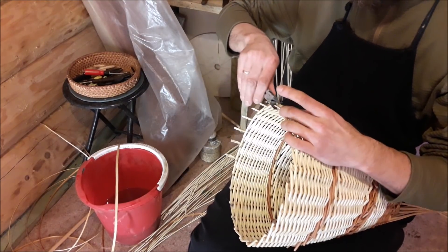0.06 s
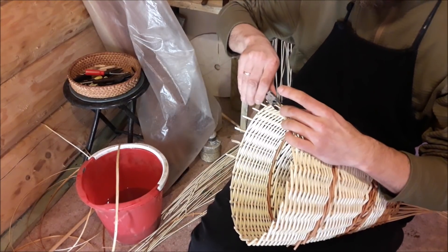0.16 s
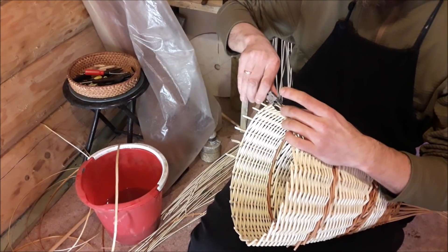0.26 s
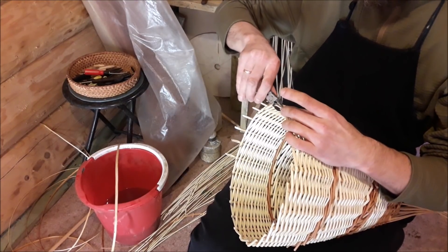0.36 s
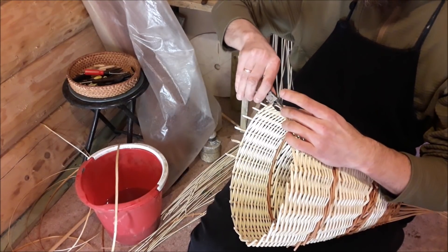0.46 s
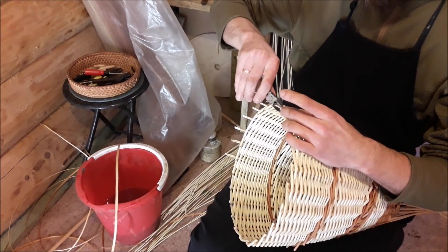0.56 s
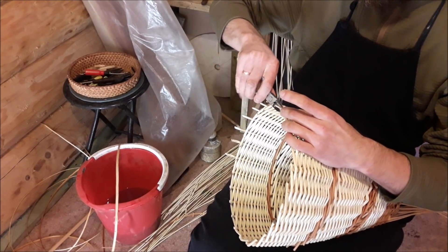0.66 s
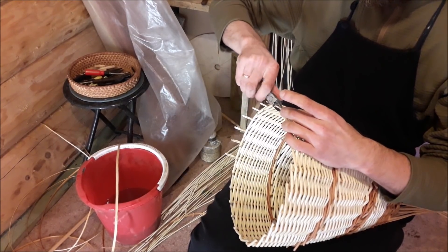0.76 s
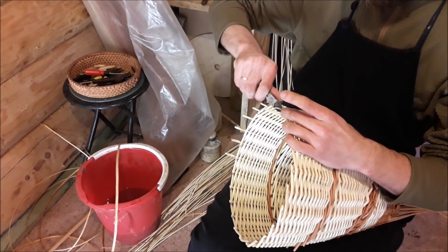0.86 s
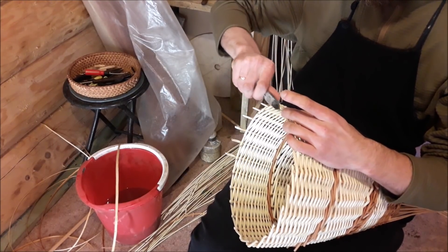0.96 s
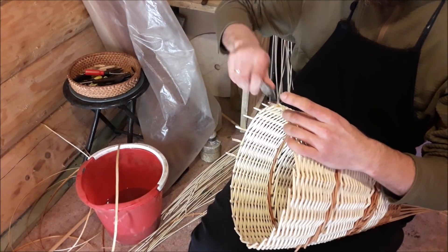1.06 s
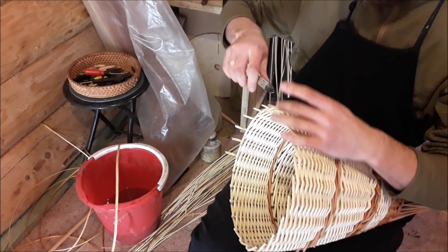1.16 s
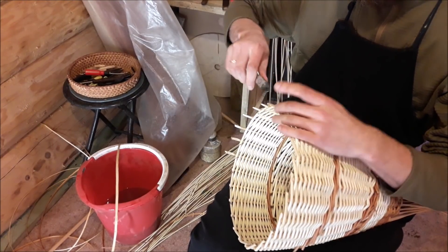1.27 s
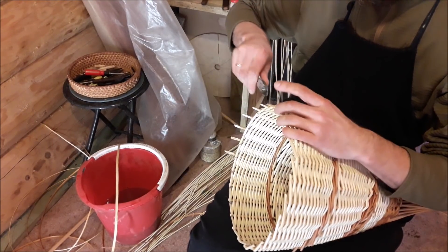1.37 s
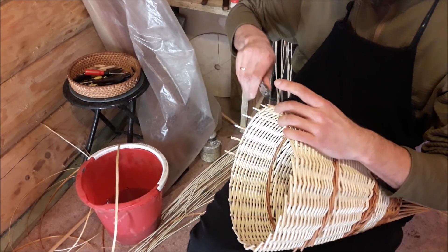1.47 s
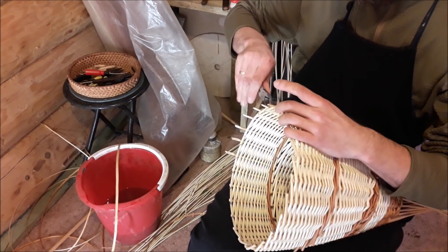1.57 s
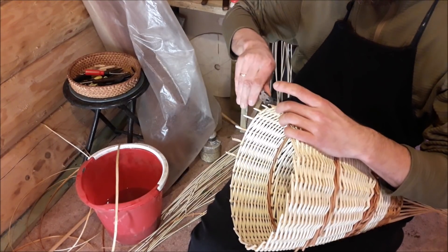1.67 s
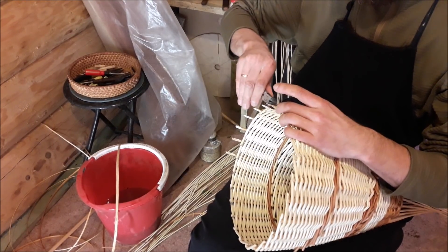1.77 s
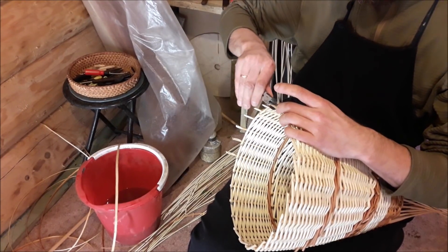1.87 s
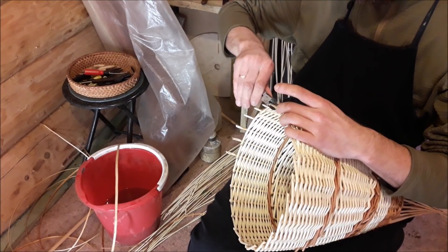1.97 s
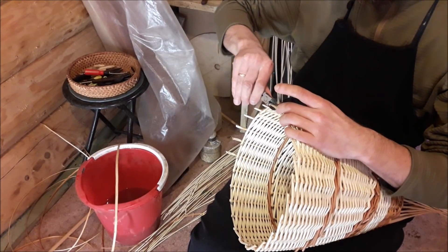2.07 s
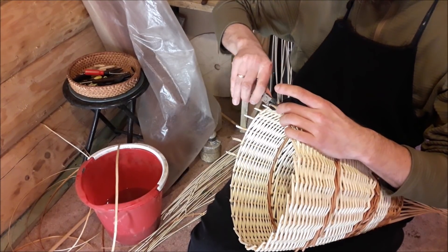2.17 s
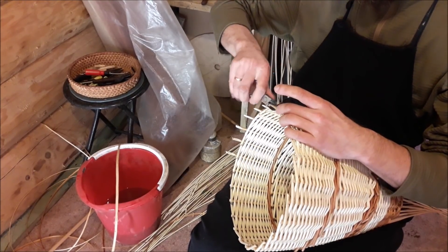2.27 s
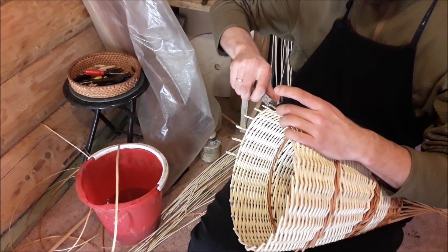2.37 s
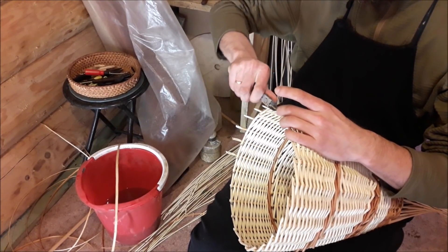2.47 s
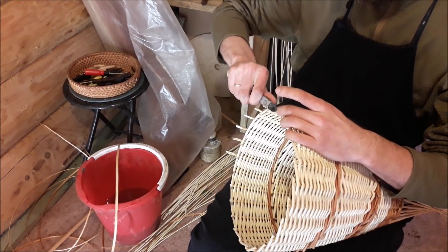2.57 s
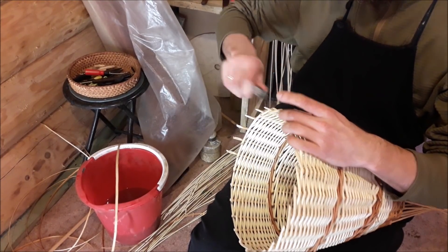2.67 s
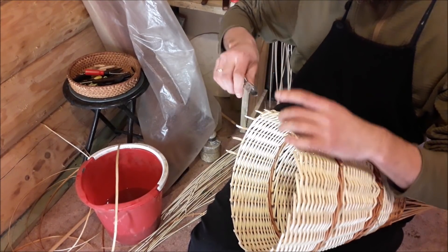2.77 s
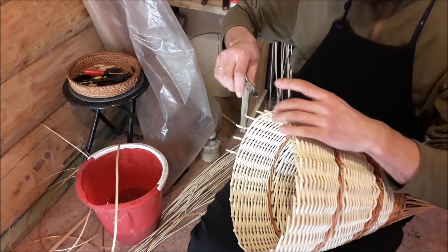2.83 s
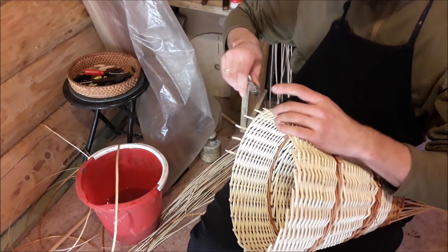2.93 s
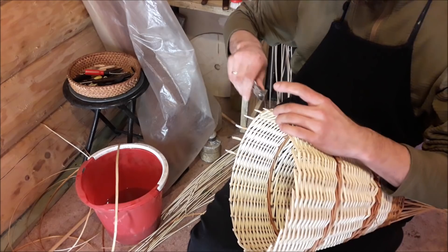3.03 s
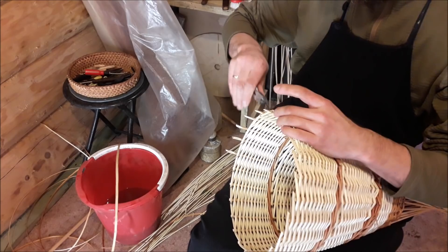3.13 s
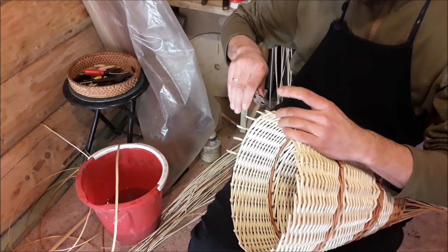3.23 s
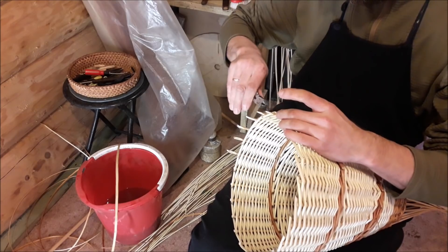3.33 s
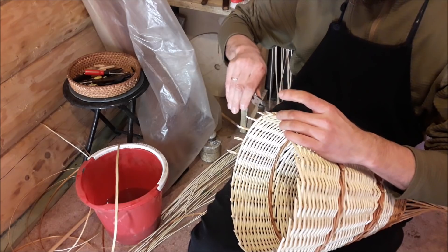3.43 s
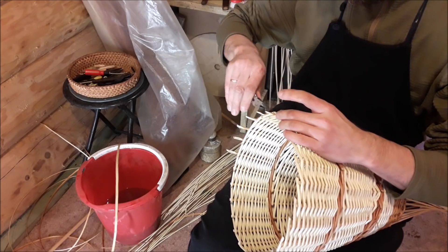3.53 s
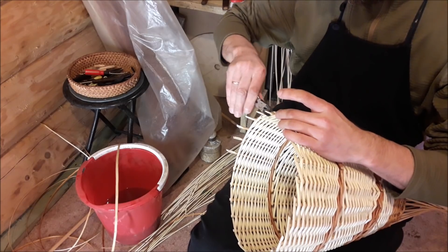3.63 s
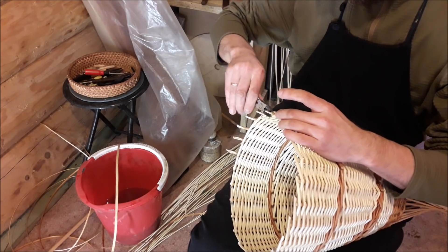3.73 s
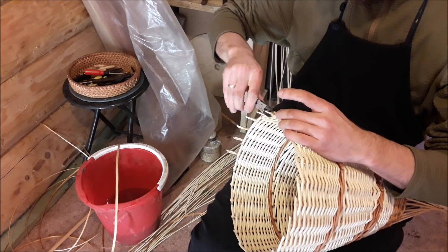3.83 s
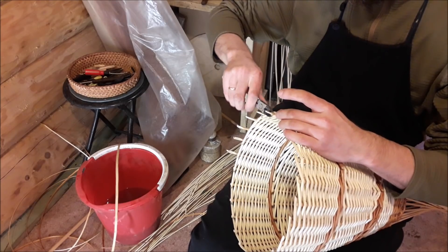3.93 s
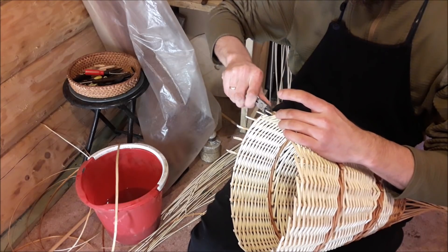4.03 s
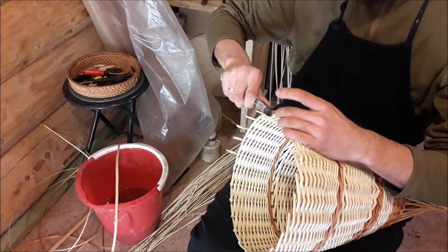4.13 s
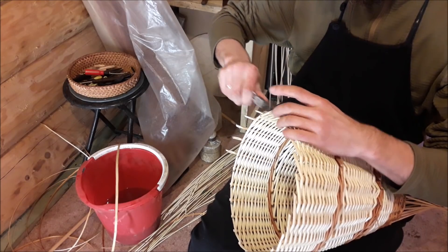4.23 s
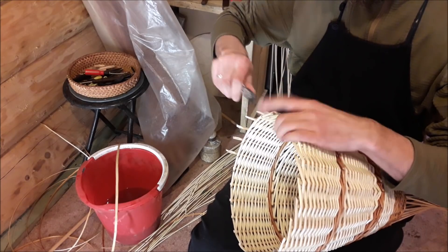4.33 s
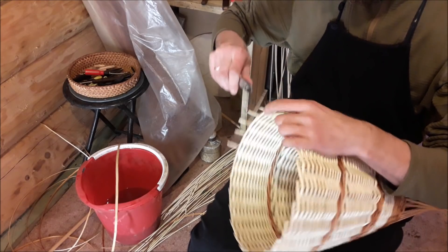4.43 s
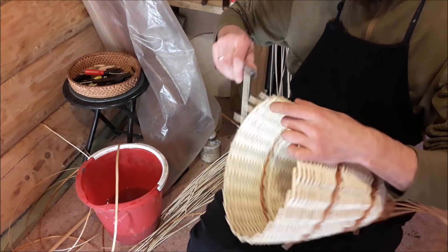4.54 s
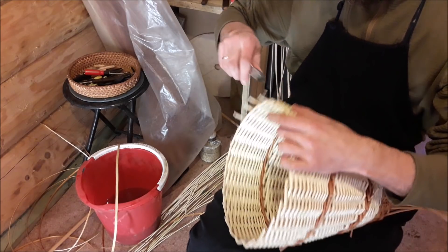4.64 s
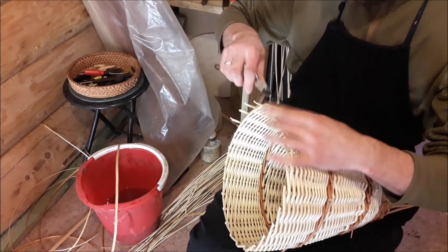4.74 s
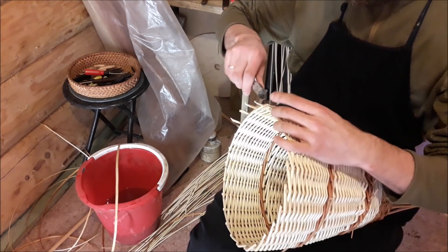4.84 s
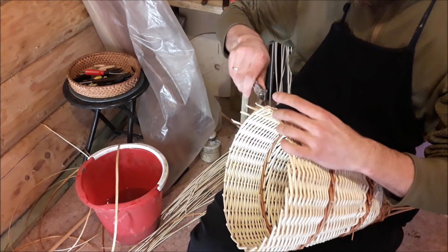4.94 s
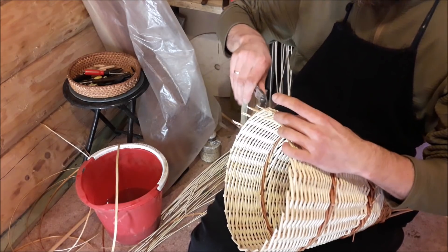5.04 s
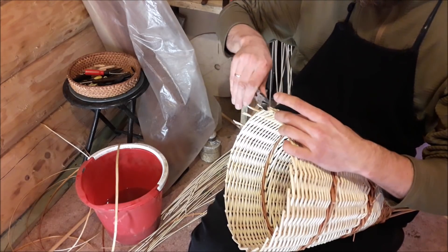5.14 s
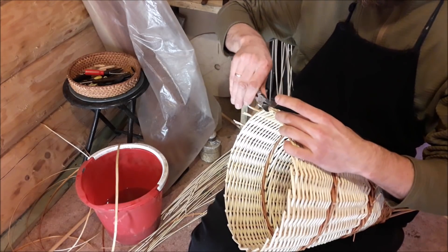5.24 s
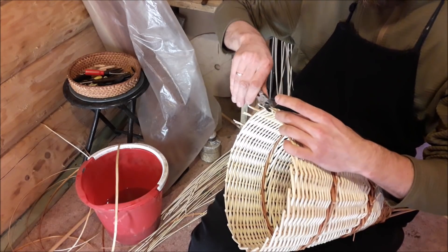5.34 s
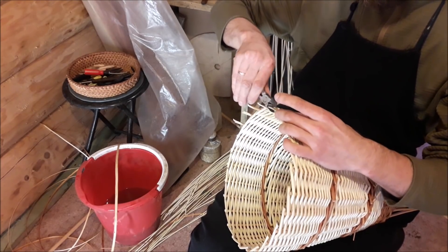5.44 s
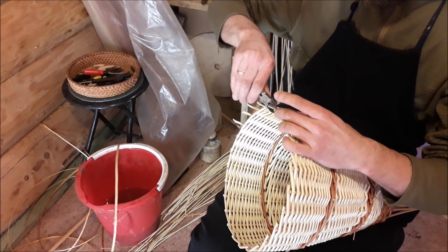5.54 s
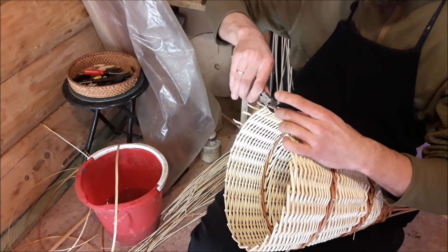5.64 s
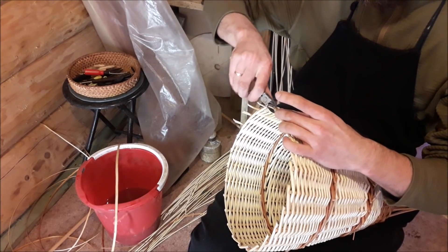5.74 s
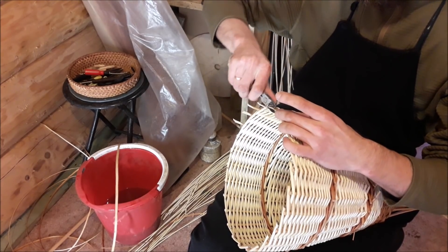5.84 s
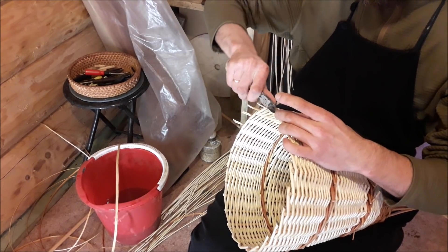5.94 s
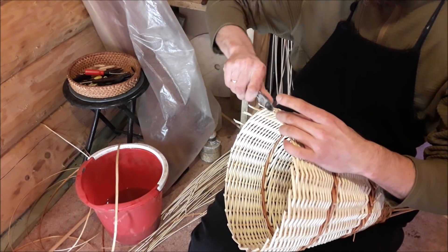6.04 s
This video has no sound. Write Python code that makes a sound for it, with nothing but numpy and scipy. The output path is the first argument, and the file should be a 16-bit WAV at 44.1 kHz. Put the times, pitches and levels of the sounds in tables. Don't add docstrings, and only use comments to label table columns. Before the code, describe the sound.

Shears snap crisply through rods about every one and a half to two seconds, between light ticks, woven creaks and a hollow basket bump.

```python
import sys
import numpy as np
from scipy import signal
from scipy.fft import rfft, irfft, next_fast_len
from scipy.io import wavfile
from scipy.ndimage import uniform_filter1d

SR = 44100
rng = np.random.default_rng(int(sys.argv[2]) if len(sys.argv) > 2 else 0)


def voltage_ratio(decibels):
    exponent = np.asarray(decibels, float) / 20
    return 10 ** exponent


def waveform_to_disk(signal):
    frames = np.transpose(np.atleast_2d(signal))
    scaled = np.clip(frames, -1, 1) * 32767
    samples = np.round(scaled).astype(np.int16)
    wavfile.write(sys.argv[1], SR, samples)


N = 269010

# time in seconds, level in dB.
HUM = [(0.0, -68), (1.0, -67), (1.45, -71), (2.2, -69.5), (3.0, -66), (3.45, -69), (4.15, -68), (4.66, -68),
       (5.11, -67.5), (6.1, -65.5)]
# frequency in Hz, level in dB per Hz.
HUM_COLOUR = [(26, -21.5), (45, -6.5), (54, -6.5), (134, 1), (383, 0.5), (858, -5), (1100, -7.5),
              (1270, -9), (2030, -9.5), (4000, -15.5), (5200, -40.5), (8800, -120)]
# frequency in Hz, level in dB per Hz.
HISS_COLOUR = [(710, -16.5), (1200, -6.5), (3180, -8), (6790, -12), (8090, -21), (11900, -9.5),
               (15100, -9.5), (16000, -13), (16500, -27)]
# start in seconds, length in seconds, level in dB.
RUSTLE = [
    (0.0, 0.46, -75.5),
    (2.7, 0.44, -76.5),
    (4.33, 0.53, -63),
    (5.36, .18, -72),
    (5.701, .4, -77),
]
# frequency in Hz, level in dB per Hz.
RUSTLE_COLOUR = [(120, -28), (250, -33), (630, -12.5), (1500, -4.5), (3200, -3.5), (6900, -4.5),
                 (8200, -14.5), (11500, -8), (15800, -9), (16900, -64)]
# start in seconds, level in dB, pitch in octaves above 1 kHz,
# fall below that pitch in dB per octave.
TICKS = [(0.8681, -33, 3.44, 8.5), (1.1418, -23.5, 3.22, 10.5), (1.2181, -54.7, 3.6, 0),
         (1.2695, -64, 0.27, 1.0), (1.5385, -59, 2.8, 2), (1.7328, -27.5, 1.79, 12.5),
         (1.7416, -48.0, 2.0, 7.5), (1.8385, -44.5, 2.3, 4.5), (1.8518, -41.5, 2.6, 6),
         (1.8808, -40.5, 2.1, 8.5), (1.928, -37, 2, 14), (1.9646, -40.5, 1.44, 17), (1.9997, -50, 2.5, 6),
         (2.007, -33, 1.77, 17.5)]
# frequency in Hz, level in dB per Hz.
TICK_COLOUR = [(88, -42.5), (150, -13), (1480, -10), (1710, -14), (2160, -9.5), (3470, -7.5), (5260, -9.5),
               (6940, -7.5), (7970, -18), (15300, -16), (16900, -49.5)]
# start in seconds, level in dB, rod resonance in Hz,
# brightness in dB per octave, splintering treble in dB.
BITES = [
    (0.9231, -36.5, 3600, -2, 2),
    (1.1442, -46, 3000, 3.5, 4),
    (1.5766, -34, 4060, 2, -5.5),
    (2.4587, -37, 4500, 3, 3),
    (3.9231, -27, 3270, 1.5, -11),
]
# frequency in Hz, level in dB per Hz.
BITE_COLOUR = [(170, -41.5), (300, -13), (620, -12.5), (1400, -12), (2200, -9.5), (7000, -7), (15300, -13)]
# start in seconds, peak in dB, frequency in Hz, T60 in seconds.
JOLTS = [
    (.99, -19, 91, 0.0078),
    (.991, -29, 235, 0.015),
    (2.458, -47, 312, 0.025),
    (2.4576, -27, 890, 0.002),
    (2.465, -46.5, 916, .006),
    (6.031, -42, 89, .03),
]
# start in seconds, level in dB, blade ring in dB, jaw ring in dB,
# splintering treble in dB.
SNIPS = [
    (0.9927, -10.5, 14, 9, 2),
    (2.5804, -10.5, 7, 8.5, -4.5),
    (4.1816, -13, 7, 1.5, -5),
    (6.033, -11, 14.5, 7.5, 5),
]
# frequency in Hz, level in dB per Hz.
SNIP_COLOUR = [(110, -56), (190, -29), (420, -17.5), (1700, -19), (2850, -14), (4000, -12), (7000, -12),
               (15000, -7)]
# frequency in Hz, gain in dB.
CAPSULE = [(5000, -0.5), (6900, 0), (8400, -8.5), (10600, -0.5), (15400, -4), (16200, -12), (16900, -44.5)]
# start in seconds, peak in dB, frequency in Hz, T60 in seconds.
NOTES = [(1.22, -60.5, 2400, 0.026), (1.578, -57, 197, 0.2), (1.868, -42, 375, 0.017),
         (2.586, -47.5, 132, 0.1), (3.74, -60.5, 328, .05), (4.085, -61.5, 710, 0.01),
         (3.925, -38, 1500, 0.0058), (1.735, -42, 2600, 0.009), (1.54, -58, 4300, .01),
         (4.181, -43.5, 143, 0.048), (2.582, -34.5, 420, .01), (4.183, -22.5, 1470, .006),
         (4.64, -57.5, 1410, 0.018), (4.836, -39, 420, 0.025), (4.838, -30.5, 694, 0.017),
         (4.84, -40, 1010, 0.017), (5.006, -44, 465, 0.05), (5.044, -49, 1007, 0.023),
         (5.045, -48, 501, 0.045), (5.128, -47.5, 252, 0.08), (5.13, -37.5, 1430, 0.0087),
         (5.262, -42, 1920, 0.01), (5.345, -46, 1984, 0.012), (6.033, -36.5, 223, 0.059)]
# start in seconds, level in dB,
# pitch in octaves above 1 kHz, fall below that pitch in dB per octave.
FLICKS = [(2.4169, -59, 0.5, 1.5), (2.7986, -59.5, 3, 0.93), (2.8341, -51, 0.4, 2.0), (2.889, -63, 3, 1.5),
          (2.9894, -57, 4, 2.8), (3.046, -52.5, 1.4, 1.8), (3.208, -40.5, 3, 6), (3.7413, -46, 2.4, 2.4),
          (4.3613, -39, 1.85, 11), (4.4004, -55, 1.5, 4.0), (4.4376, -41.5, 2.5, 6.0),
          (4.5269, -50, 0.2, 0.81), (4.6369, -50.5, 2, 2.9), (5.188, -59, 2, 4.0), (5.255, -41, 3, 4.8),
          (5.2604, -39, 1.2, 5), (5.3385, -44.5, 2.5, 6.4), (5.3467, -40, 1.77, 9.9),
          (5.4678, -55, -0.5, 1.5), (5.92, -57, 2.5, 3.5)]
# start in seconds, level in dB, pitch in octaves above 1 kHz,
# fall below that pitch in dB per octave.
FIBRES = [
    (4.084, -53, 1.59, 3.76),
    (4.123, -48, 2.75, 2.5),
    (4.148, -48, 3.4, 3.5),
    (4.16, -40.5, 3.5, 2.6),
    (4.167, -33, 0.61, 5.2),
    (6.005, -48.5, 2.9, 6.1),
]
# start in seconds, level in dB, pitch in octaves above 1 kHz,
# fall below that pitch in dB per octave.
KNOCKS = [
    (4.8307, -31, -1.1, 2.72),
    (4.8386, -39.5, -1.2, 1.95),
    (5.0037, -40.5, 0.5, 3),
    (5.0414, -40.5, 0.46, 2.7),
    (5.1264, -46.5, -1.1, 1.2),
    (5.1347, -59, 1.2, 4.0),
]
# frequency in Hz, level in dB per Hz.
KNOCK_COLOUR = [(100, -48.5), (260, -10.5), (620, -5.5), (1150, -0.5), (1590, -3.5), (2150, 0.5),
                (2340, -2), (6850, -18.5), (8310, -40), (15200, -62.5), (16900, -68.5)]
BAND_EDGES_HZ = [200, 1200, 3500, 8000, 16000]
# frequency in Hz, T60 in seconds.
ROOM_T60_S = [(300, 0.21), (1200, .17), (2250, 0.18), (3500, 0.16), (6000, .16), (13000, .14)]

SPAN = 12288
HZ = np.fft.rfftfreq(SPAN, 1 / SR)
FIRST_ECHO_S, BUILD_UP_S, DENSE_AFTER_S = 0.0018, 0.012, 0.0081
BEND = 0.98
HISS_DB = -73.5
CRACKLES_PER_S, RUSTLE_ATTACK_S, RUSTLE_RELEASE_S = 1600, 0.065, 0.15
FALL_ABOVE = 2.01
TICK_DIRECT_DB, FLICK_DIRECT_DB, KNOCK_DIRECT_DB = 5.5, 1, -3
SNIP_DIRECT_DB, BITE_DIRECT_DB = -0.4, 3.5
ROD_DB, ROD_OCTAVES = 8, 0.27
CAPSULE_PEAK_HZ, CAPSULE_PEAK_DB, CAPSULE_PEAK_OCTAVES = 7600, 4, 0.086
BLADE_HZ, BLADE_OCTAVES = 2254, 0.17
JAW_HZ, JAW_OCTAVES = 5900, 0.33
SPLINTER_HZ = 8500
NOTE_ATTACK_S = 0.0015
NOTE_ROOM_DB, NOTE_ROOM_DB_PER_OCTAVE = -26, 2.5
JOLT_ROOM_DB = -44
LOW_EDGE_HZ, TOP_EDGE_HZ = 55, 16100


def rms_one(x):
    return x / np.sqrt(np.mean(x ** 2, axis=-1, keepdims=True) + 1e-20)


def at_hz(points, hz):
    points_hz, values = np.array(points).T
    return np.interp(np.log(hz + 1), np.log(points_hz), values)


def causal(db):
    cepstrum = irfft(np.log(voltage_ratio(db)))
    half = cepstrum.shape[-1] // 2
    cepstrum[..., 1:half] *= 2
    cepstrum[..., half + 1:] = 0
    return np.exp(rfft(cepstrum))


def coloured(x, spectrum):
    size = next_fast_len(N + SPAN)
    gain = voltage_ratio(at_hz(spectrum, np.fft.rfftfreq(size, 1 / SR)))
    return rms_one(irfft(rfft(x, size) * gain, size)[:N])


def drift(rate):
    knots = rng.standard_normal(int(N / SR * 40) + 3)
    return np.interp(np.arange(N) / SR * rate, np.arange(len(knots)), knots)


def room(count):
    t = np.arange(SPAN) / SR
    spikes_db = 4.8 * np.exp(-t / DENSE_AFTER_S) * np.minimum(rng.exponential(1, (count, SPAN)), 7)
    echoes = rng.standard_normal((count, SPAN)) * voltage_ratio(spikes_db)
    echoes /= np.sqrt(uniform_filter1d(echoes ** 2, size=301, axis=1))
    first_gap = np.clip((t - 0.0006) / FIRST_ECHO_S, 0, 1)
    rise = first_gap * (1 - 0.5 * np.exp(-t / BUILD_UP_S))
    spectrum = 0
    for k, (_, t60) in enumerate(ROOM_T60_S):
        share = at_hz([(centre, j == k) for j, (centre, _) in enumerate(ROOM_T60_S)], HZ)
        decay = voltage_ratio(-60 * (1.075 * t / t60) ** BEND)
        spectrum = spectrum + share * rfft(echoes * rise * decay)
    power = np.abs(spectrum) ** 2
    near = uniform_filter1d(power, size=61, axis=1)
    far = uniform_filter1d(power, size=901, axis=1)
    return spectrum * causal(10 * np.log10((far + 1e-9) / (near + 1e-9)))


def placed(at_s, sounds):
    out = np.zeros(N + SPAN)
    for s, sound in zip(at_s, sounds):
        start = round(s * SR)
        out[start:start + SPAN] += sound
    return out[:N]


def clicks(at_s, spectra_db, direct_db, bounce_s, trim_db):
    count = len(at_s)
    lag_s = bounce_s * rng.uniform(0.35, 1.6, (count, 1))
    sign = rng.choice([-1, 1], (count, 1))
    wall = 0.91 * np.exp(-2j * np.pi * HZ * lag_s)
    direct = sign * (1 + wall) * voltage_ratio(min(direct_db, 7.5) + 13.5)
    return placed(at_s, voltage_ratio(trim_db) * irfft(causal(spectra_db) * (direct + room(count))))


def balanced(table, colour):
    at_s, level_db, pitch, fall_db = np.array(table).T[:, :, None]
    shape_db = at_hz(colour, HZ)
    band_db, centres = [], []
    for low, high in zip(BAND_EDGES_HZ, BAND_EDGES_HZ[1:]):
        inside = (HZ > low) * (HZ < high)
        band_db.append(10 * np.log10(np.mean(voltage_ratio(2 * shape_db) * inside)))
        centres.append(np.sqrt(low * high))
    above = np.log2(np.array(centres) / 1000) - pitch
    wanted_db = level_db - fall_db * np.maximum(-above, FALL_ABOVE * above)
    bends_db = wanted_db - np.array(band_db)
    spectra_db = [shape_db + at_hz(list(zip(centres, bend)), HZ) for bend in bends_db]
    return at_s[:, 0], np.array(spectra_db)


def hump(centre_hz, octaves):
    return 1 / (1 + (np.log2((HZ + 1) / centre_hz) / octaves) ** 4)


def cracks(at_s, level_db, treble_db, shapes_db, direct_db):
    splinter_db = treble_db / (1 + (SPLINTER_HZ / (HZ + 1)) ** 8)
    shapes_db = shapes_db + splinter_db + at_hz(CAPSULE, HZ)
    power_db = 10 * np.log10(np.mean(voltage_ratio(2 * shapes_db), axis=1, keepdims=True))
    return clicks(at_s[:, 0], shapes_db + level_db - power_db, direct_db, bounce_s=0.00071, trim_db=1.5)


def damped_modes(table, room_db, db_per_octave, attack_s):
    at_s, db, hz, t60 = np.array(table).T[:, :, None]
    t = np.arange(SPAN) / SR
    envelope = voltage_ratio(db - 60 * t / t60) * (1 - np.exp(-t / attack_s))
    swing = envelope * np.sin(2 * np.pi * hz * t)
    airborne = (HZ / 200) ** 2 / (1 + (HZ / 390) ** 2)
    wet = voltage_ratio(room_db + db_per_octave * np.log2(hz / 1000))
    return placed(at_s[:, 0], irfft(rfft(swing) * (1 + wet * airborne * room(len(swing)))))


def background():
    s, db = np.transpose(HUM)
    hum_db = np.interp(np.arange(N) / SR, s, db) + 1.5 * drift(8.8)
    hum = voltage_ratio(hum_db) * coloured(rng.standard_normal(N), HUM_COLOUR)
    hiss = voltage_ratio(HISS_DB + 0.8 * drift(4)) * coloured(rng.standard_normal(N), HISS_COLOUR)
    return hum + hiss


def rustle():
    t = np.arange(N) / SR
    gain = np.zeros(N)
    for s, length, db in RUSTLE:
        attack = (t - s) / RUSTLE_ATTACK_S
        release = (s + length - t) / RUSTLE_RELEASE_S + 0.5
        gain += voltage_ratio(db - 1.5) * np.clip(np.minimum(attack, release), 0, 1)
    born = rng.random(N) < CRACKLES_PER_S * voltage_ratio(2.5 * drift(18)) / SR
    strength = voltage_ratio(3 * np.minimum(rng.exponential(1, N), 5))
    crackle = born * rng.choice([-1, 1], N) * strength
    tail = irfft(room(1))[0]
    tail[0] += 6
    return gain * coloured(signal.fftconvolve(crackle, tail)[:N], RUSTLE_COLOUR)


def ticks():
    return clicks(*balanced(TICKS, TICK_COLOUR), TICK_DIRECT_DB, bounce_s=0.0014, trim_db=-8)


def bites():
    at_s, level_db, rod_hz, tilt_db, treble_db = np.array(BITES).T[:, :, None]
    rod_db = ROD_DB * hump(rod_hz, ROD_OCTAVES) + tilt_db * np.log2((HZ + 100) / rod_hz)
    peak_db = CAPSULE_PEAK_DB * hump(CAPSULE_PEAK_HZ, CAPSULE_PEAK_OCTAVES)
    return cracks(at_s, level_db, treble_db, at_hz(BITE_COLOUR, HZ) + rod_db + peak_db, BITE_DIRECT_DB)


def jolts():
    return damped_modes(JOLTS, JOLT_ROOM_DB, 0, 1 / SR)


def snips():
    at_s, level_db, blade_db, jaw_db, treble_db = np.array(SNIPS).T[:, :, None]
    rings_db = blade_db * hump(BLADE_HZ, BLADE_OCTAVES) + jaw_db * hump(JAW_HZ, JAW_OCTAVES)
    return cracks(at_s, level_db, treble_db, at_hz(SNIP_COLOUR, HZ) + rings_db, SNIP_DIRECT_DB)


def woody_notes():
    return damped_modes(NOTES, NOTE_ROOM_DB, NOTE_ROOM_DB_PER_OCTAVE, NOTE_ATTACK_S)


def flicks():
    return clicks(*balanced(FLICKS, TICK_COLOUR), FLICK_DIRECT_DB, bounce_s=0.0008, trim_db=-6.5)


def fibres():
    return clicks(*balanced(FIBRES, TICK_COLOUR), FLICK_DIRECT_DB, bounce_s=0.0008, trim_db=-6.5)


def knocks():
    return clicks(*balanced(KNOCKS, KNOCK_COLOUR), KNOCK_DIRECT_DB, bounce_s=0.0013, trim_db=-3)


def scene():
    shears = bites() + snips()
    rods = ticks() + woody_notes() + flicks() + fibres()
    basket = rustle() + knocks()
    return (background() + shears + rods + basket + jolts())[None]


def band_limit(x):
    return signal.sosfilt(signal.butter(12, 17030, fs=SR, output="sos"), x)


def record(dry):
    high_pass = signal.butter(2, LOW_EDGE_HZ, "high", fs=SR, output="sos")
    top_shelf = signal.cheby2(20, 24, TOP_EDGE_HZ, fs=SR, output="sos")
    thin = signal.sosfilt(high_pass, dry)
    shelved = signal.sosfilt(top_shelf, thin)
    return band_limit(shelved - 0.0004)


dry = scene()
out = record(dry)
waveform_to_disk(out)
```